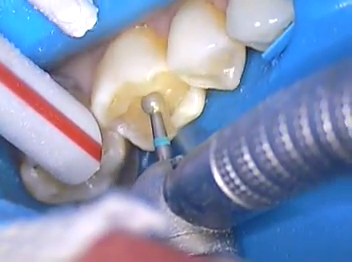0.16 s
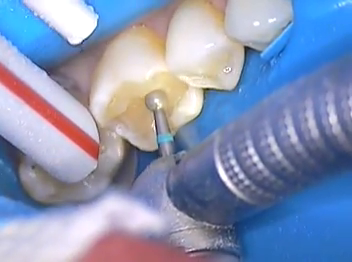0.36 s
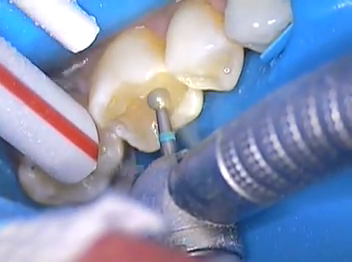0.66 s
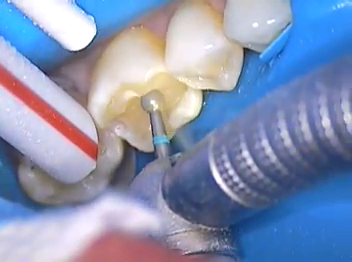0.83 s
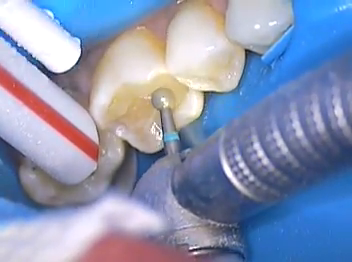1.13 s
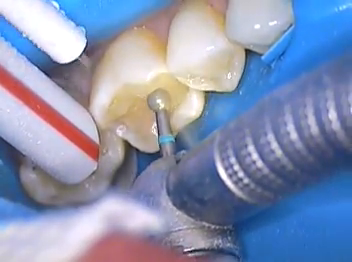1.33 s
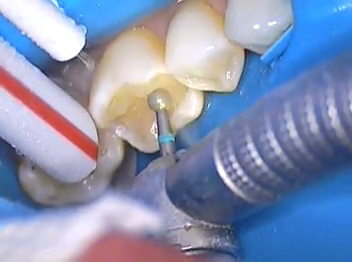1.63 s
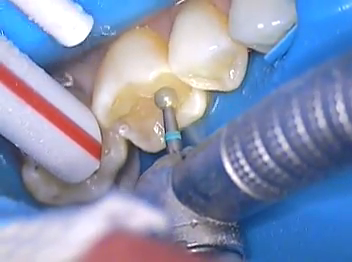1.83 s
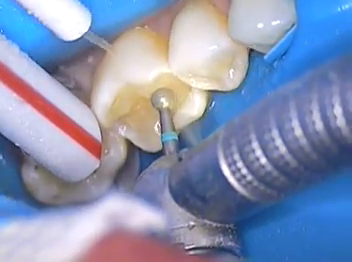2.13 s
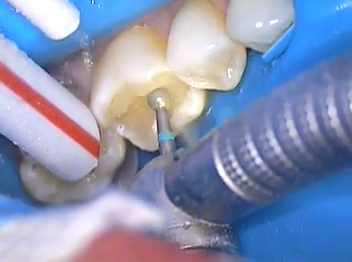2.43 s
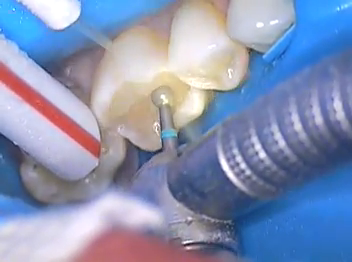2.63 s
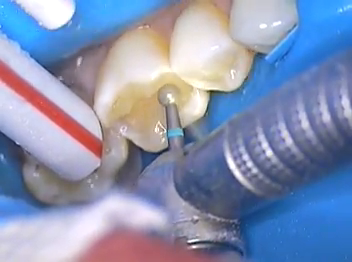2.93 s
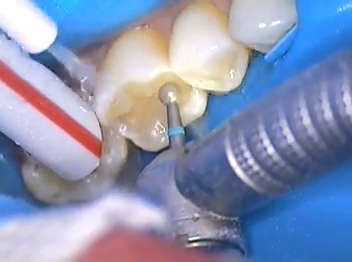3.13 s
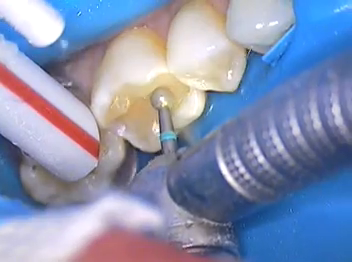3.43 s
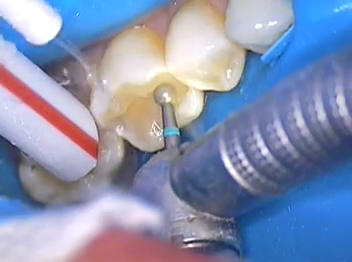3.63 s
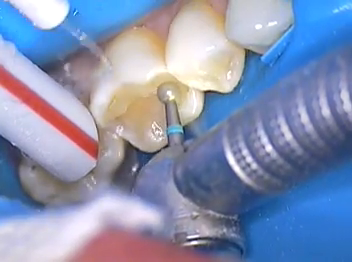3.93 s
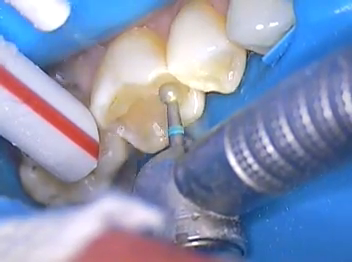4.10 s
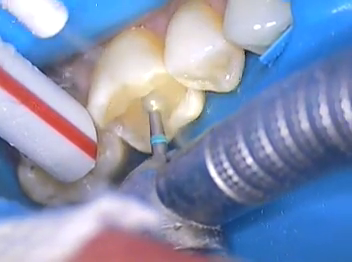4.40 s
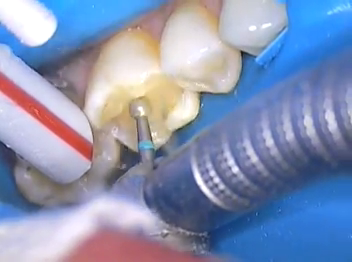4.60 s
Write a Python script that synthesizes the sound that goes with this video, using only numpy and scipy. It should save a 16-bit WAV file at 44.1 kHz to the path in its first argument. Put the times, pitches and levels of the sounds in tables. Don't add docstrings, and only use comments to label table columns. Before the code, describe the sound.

Close, dense hiss of spray and suction surrounds a piercing drill whine that dips under load, while water clicks and a slurp gurgles late.

```python
import sys
import numpy as np
from scipy import signal
from scipy.fft import rfft, irfft
from scipy.io import wavfile

SR = 44100
rng = np.random.default_rng(int(sys.argv[2]) if len(sys.argv) > 2 else 0)


def ratio(d):
    e = np.asarray(d, float) / 20
    return 10 ** e


def unload_audio(sound):
    columns = np.transpose(np.atleast_2d(sound))
    steps = np.round(np.clip(columns, -1, 1) * 32767)
    wavfile.write(sys.argv[1], SR, steps.astype(np.int16))


N = 209739

# start in seconds, speed at which the rotor would settle in Hz.
LOADS_S_HZ = [(0.023, 7450.0), (0.063, 8790.0), (0.147, 8240.0), (0.265, 6780.0), (0.487, 7810.0),
              (0.6, 8660.0), (0.751, 7900.0), (0.86, 8590.0), (0.961, 7120.0), (1.117, 8130.0),
              (1.265, 8480.0), (1.393, 7860.0), (1.564, 8640.0), (1.597, 7440.0), (1.702, 6280.0),
              (1.825, 6720.0), (1.975, 8040.0), (2.085, 6840.0), (2.489, 7230.0), (2.593, 6740.0),
              (2.711, 7220.0), (2.839, 7630.0), (3.024, 7350.0), (3.236, 5860.0), (3.306, 6610.0),
              (3.614, 6370.0), (3.837, 6080.0), (3.939, 6580.0), (4.178, 6100.0), (4.4, 5590.0)]
START_HZ, ROTOR_LAG_S, HAND_LAG_S = 8355, .2034, .023

# time in seconds, level in dB.
WHINE_S_DB = [(0, -41.5), (.4, -42), (.69, -44), (.98, -41), (1.14, -44), (1.5, -42.5), (1.71, -45.5),
              (2.07, -42), (2.105, -56), (2.13, -41), (2.43, -44), (2.54, -48), (2.93, -48), (3.2, -52.5),
              (3.28, -44), (3.79, -52), (4.3, -56), (4.7, -65)]
BITE_DB_PER_KHZ_S = .44

# centre in Hz, width in Hz, depth in dB.
DEAD_SPOTS_HZ_DB = [(7504, 60, 11), (6740, 55, 11), (6410, 27, 5)]

# start in seconds, length in seconds, level in dB.
CHATTER_S_DB = [
    (2.16, .27, -49),
    (3.3, .06, -50),
]
CHATTER_RATIO, CHATTER_EDGE_S = 1.135, .02

# centre in Hz, width in Hz, level in dB.
TUBE_HZ_DB = [(318, 570, -26), (452, 71, -21), (582, 56, -20), (817, 700, -22.5), (1009, 32, -13),
              (1140, 130, -12), (1316, 182, -3.5), (1458, 96, -1), (1613, 138, -4.5), (1780, 95, -12.5),
              (2018, 63, -17), (2350, 920, -15.5), (2538, 490, -8.5), (2633, 93, -5.5), (2820, 290, -4.5),
              (3146, 220, 0.4), (3298, 87, 1), (3457, 81, -2.5), (3680, 480, -4.5), (3846, 48, -4.5),
              (4160, 65, -5.5), (4430, 58, -6), (4640, 690, 0), (5060, 780, -9), (5314, 420, -4.5),
              (5590, 430, -9)]

# centre in Hz, width in Hz, level in dB.
SPRAY_HZ_DB = [(6230, 130, -12), (6870, 950, -7), (7050, 490, -16), (7600, 260, -4.5), (7730, 650, -4),
               (8260, 940, -6.5), (8445, 580, -0.9), (9230, 1280, -4.5), (9680, 320, -7.5),
               (10200, 380, -12.5), (10820, 580, -10), (11170, 380, -9), (11830, 1300, -9.5),
               (12700, 940, -11.5), (13200, 860, -21)]
MODE_DB = -26.5

# top in seconds, rise in seconds, gain in dB.
POOLS_S_DB = [
    (1.49, 0.45, 3.5),
    (2.18, 0.28, 2.5),
    (4.45, 1, 2.5),
]
DRAIN_SHARE = 0.68

# top in seconds, gain in dB.
SURGES_S_DB = [
    (.8, 0),
    (1.2, 1),
    (1.65, 0.5),
    (2.75, 0.5),
    (3.0, -1.5),
    (3.4, -1),
    (3.68, 2.5),
    (4.6, 1),
]
SURGE_S, OVERTONE_SHARE = 0.13, 0.26

# time in seconds, gain in dB.
SLURP_S_DB = [
    (3.58, 0),
    (3.64, 5),
    (3.69, 11),
    (3.79, 12),
    (3.815, 2),
    (3.95, 0),
]
SLURP_HZ, SLURP_OCTAVES = 510, 1

# time in seconds, gain in dB.
FLOW_S_DB = [(0, -.5), (.4, 0.5), (.8, -0.5), (1.4, 0), (2.2, 0.1), (2.45, -0.5), (3.0, -0.5), (3.3, -1),
             (3.9, 0), (4.3, 0), (4.76, .5)]

# frequency in Hz, density in dB per Hz.
RUMBLE_HZ_DB = [(3, -12), (9, -1), (15, 0), (22, -8), (30, -14), (45, -18), (62, -20), (80, -27),
                (100, -33), (125, -50)]
RUMBLE_DB, HUM_HZ, HUM_DB = -61.5, 59.7, -76.5

# top in seconds, rise in seconds, gain over the calm in dB.
GUSTS_S_DB = [
    (0, .2, 6),
    (.62, .3, 10),
    (1.42, 0.091, 3),
    (1.86, 0.32, 17),
    (2.8, 0.089, 9),
    (2.95, .08, 7),
    (3.28, 0.097, 6),
    (3.7, 0.25, 16.5),
    (4.8, 0.31, 14),
]
CALM_DB = -93

# centre in seconds, peak in dB, signed scale, half cycle in ms.
PUFFS_S_DB_MS = [(.281, -49.5, -1.05, 2.8), (0.381, -58, -1.1, 2.6), (1.575, -54, 1, 1.9),
                 (1.652, -47, 1, 3.5), (1.8455, -38, 1, 2.74), (2.2157, -66, 0.74, 2),
                 (2.391, -45.5, -1.15, 2.8), (2.941, -61, -1, 1.5), (3.515, -49.5, -1.1, 3),
                 (4.657, -54, -1, 2.5), (4.743, -42, 0.51, 3.2)]

# time in seconds, peak in dB.
BUBBLES_S_DB = [(1.021, -54), (1.659, -42), (2.212, -49), (2.323, -54), (2.686, -50), (2.975, -56),
                (3.198, -44.5), (3.606, -44.5), (3.649, -39), (3.868, -44), (4.236, -48)]

# start in seconds, level in dB, length in ms, centre in Hz.
SPITS_S_DB_MS_HZ = [
    (1.4465, -36, 9.0, 9100),
    (1.4465, -42, 8.0, 12300),
    (1.4475, -46, 8.0, 10900),
    (1.448, -44, 6.0, 3200),
    (3.214, -43, 8.0, 7900),
]

OPEN_TOP_S = [3.78, 4.04]
CUTOFF_HZ, OFFSET = 13930, .0042


def in_time(rows):
    s, *columns = np.transpose(rows)
    return [np.interp(np.arange(N) / SR, s, c) for c in columns]


def swells(rows, fall_share):
    s, rise_s, gain_db = np.transpose(rows)
    u = (np.arange(N)[:, None] / SR - s) / rise_s
    return np.exp(-np.where(u < 0, u, u / fall_share) ** 2) @ gain_db


def drift(rate_hz):
    r = np.exp(-80 * np.pi * rate_hz / SR)
    noise = rng.standard_normal(N // 40 + 2002)
    slow = signal.lfilter([1], [1, -2 * r, r * r], noise)[2000:]
    return np.interp(np.arange(N) / 40, np.arange(len(slow)), slow / slow.std())


def resonate(x, hz, width_hz):
    r = np.exp(-np.pi * width_hz / SR)
    section = [(1 - r * r) / 2, 0, (r * r - 1) / 2, 1, -2 * r * np.cos(2 * np.pi * hz / SR), r * r]
    return signal.sosfilt([section, section], x)


def rotor_hz():
    s, settle_hz = np.transpose(LOADS_S_HZ)
    load = np.searchsorted(s, np.arange(N) / SR)
    change_hz = np.r_[0, settle_hz - START_HZ][load]
    for lag_s in HAND_LAG_S, ROTOR_LAG_S:
        keep = np.exp(-1 / (lag_s * SR))
        change_hz = signal.lfilter([1 - keep], [1, -keep], change_hz)
    return START_HZ + change_hz


def turbine():
    hz, t = rotor_hz(), np.arange(N) / SR
    level_db = in_time(WHINE_S_DB)[0] - BITE_DB_PER_KHZ_S * np.gradient(hz) * SR / 1000
    for dead_hz, width_hz, depth_db in DEAD_SPOTS_HZ_DB:
        level_db = level_db - depth_db * np.exp(-((hz - dead_hz) / width_hz) ** 2 / 2)
    phase = 2 * np.pi * np.cumsum(hz + 6.3 * drift(59.0)) / SR
    flutter_db = 1.2 * drift(20.0)
    whine = ratio(level_db + flutter_db) * np.sin(phase)

    bite = np.zeros(N)
    for s, length_s, db in CHATTER_S_DB:
        edge = np.minimum(t - s, s + length_s - t) / CHATTER_EDGE_S
        bite += ratio(db) * np.clip(edge, 0, 1)
    rough = 2 * np.pi * np.cumsum(20.0 * drift(85.0)) / SR
    chatter = bite * ratio(5.9 * drift(40.0)) * np.sin(CHATTER_RATIO * phase + rough)
    return np.sqrt(2) * (whine + chatter)


def air(modes, swing_db_at, shared_db, own_db):
    white = rng.standard_normal((4, N))
    shared = drift(18.4)
    out = np.zeros(N)
    for k, (hz, width_hz, level_db) in enumerate(modes):
        flicker_db = shared_db * shared + own_db * drift(4.6)
        gain = ratio(MODE_DB + level_db + swing_db_at(hz) + flicker_db)
        out += gain * resonate(white[k % 4], hz, width_hz)
    return out


def suction(surge_db):
    gurgle_db = swells(POOLS_S_DB, DRAIN_SHARE) - .5 + 1.2 * drift(26.0)
    slurp_db = in_time(SLURP_S_DB)[0]
    high_db = .3 + OVERTONE_SHARE * surge_db + 0.28 * drift(1.3)

    def swing_db_at(hz):
        if hz < 950:
            octaves = np.log2(hz / SLURP_HZ)
            return gurgle_db + slurp_db * np.exp(-(octaves / SLURP_OCTAVES) ** 2)
        return surge_db if hz < 2100 else high_db

    tube = air(TUBE_HZ_DB, swing_db_at, shared_db=0.49, own_db=0.65)
    bass_cut = signal.butter(6, 175.0, "high", fs=SR, output="sos")
    return signal.sosfilt(bass_cut, tube)


def spray(surge_db):
    flow_db = in_time(FLOW_S_DB)[0]
    low_db = 2.1 * flow_db - .5
    mid_db = 0.7 * flow_db - .1
    top_db = .4 * flow_db + 0.34 * surge_db + .2

    def swing_db_at(hz):
        if hz < 8000:
            return low_db
        return mid_db if hz < 10100 else top_db

    return air(SPRAY_HZ_DB, swing_db_at, shared_db=0.52, own_db=0.72)


def draught():
    hz = np.maximum(np.arange(N // 2 + 1) * SR / N, 1)
    point_hz, point_db = np.transpose(RUMBLE_HZ_DB)
    colour = ratio(np.interp(np.log(hz), np.log(point_hz), point_db, left=-60, right=-90))
    rumble = irfft(rfft(rng.standard_normal(N)) * colour, N) * ratio(2.0 * drift(12.0))
    gusts = resonate(rng.standard_normal(N), 124.0, 224.0)
    gust_db = CALM_DB + swells(GUSTS_S_DB, 1.3) + 7.5 + 2.9 * drift(20.0)
    gusts = ratio(gust_db) * gusts / gusts.std()
    hum = np.sqrt(2) * ratio(HUM_DB) * np.sin(2 * np.pi * HUM_HZ * np.arange(N) / SR)
    return ratio(RUMBLE_DB) * rumble / rumble.std() + gusts + hum


def puffs():
    t, out = np.arange(N) / SR, np.zeros(N)
    for s, peak_db, sign, ms in PUFFS_S_DB_MS:
        u = (t - s) / ms * 1890.0
        out += sign * ratio(peak_db) * u * np.exp(.5 - u * u / 2)
    return out


def bubbles():
    s, peak_db = np.transpose(BUBBLES_S_DB)
    strength_db = rng.normal(0, 3.4, (len(s), 3))
    out = np.zeros(N)
    for k, (hz, width_hz) in enumerate([(460, 110), (580, 84), (820, 330)]):
        clicks = np.full(N, 1e-18)
        clicks[np.round(s * SR).astype(int)] = ratio(peak_db - 17.5 + strength_db[:, k]) * SR / width_hz
        out += resonate(clicks, hz, width_hz)
    return out


def spits():
    out, t = np.zeros(N), np.arange(1500) / SR
    for s, level_db, ms, hz in SPITS_S_DB_MS_HZ:
        shape = t / ms * 4300.0 * np.exp(1 - t / ms * 2570.0)
        burst = resonate(rng.standard_normal(len(t)), hz, 1500.0)
        out[round(s * SR):][:len(t)] += ratio(level_db) * shape * burst / burst.std()
    return out


def scene():
    surge_db = swells([(s, SURGE_S, db) for s, db in SURGES_S_DB], 0.82)
    mono = turbine() + suction(surge_db) + spray(surge_db)
    mono += draught() + puffs() + bubbles() + spits()
    return np.array([mono, mono])


def channel_flecks(mono, count=90):
    out, window, bins_hz = np.zeros(N), np.hanning(2048) ** 2, np.arange(1025) * SR / 2048
    starts = 200 + 1024 * rng.integers(0, N // 1024 - 3, count)
    for at, hz in zip(starts, rng.uniform(1790, 13900, count)):
        band = abs(bins_hz - hz) < np.minimum(.06 * hz, 340)
        fleck = irfft(rfft(mono[at:at + 2048]) * band)[::-1]
        out[at:at + 2048] += window * fleck * hz / 9000
    return ratio(-8.0) * out


def low_pass(x):
    return signal.sosfilt(signal.butter(12, 14500, fs=SR, output="sos"), x)


def record(dry):
    hz, t = np.arange(N // 2 + 1) * SR / N, np.arange(N) / SR
    cut = irfft(rfft(dry) * (hz < CUTOFF_HZ), N)
    opened = sum(np.exp(-((t - s) / .01) ** 2) for s in OPEN_TOP_S)
    cut = cut + ratio(7) * opened * (dry - cut)
    flecks = channel_flecks(cut[0]) * [[1], [-1]]
    return low_pass(cut + OFFSET + flecks)


dry = scene()
out = record(dry)
unload_audio(out)
```